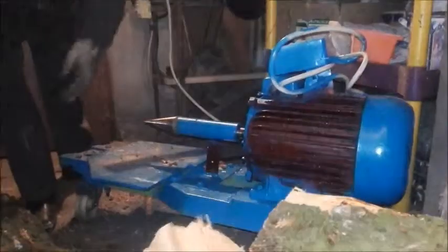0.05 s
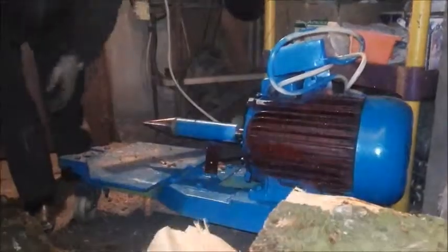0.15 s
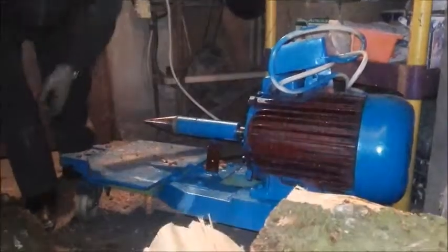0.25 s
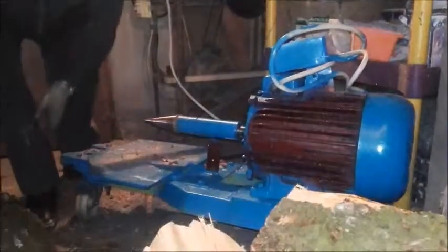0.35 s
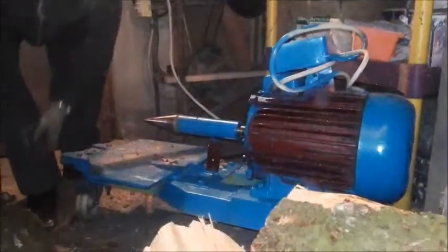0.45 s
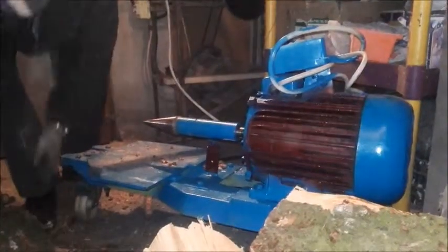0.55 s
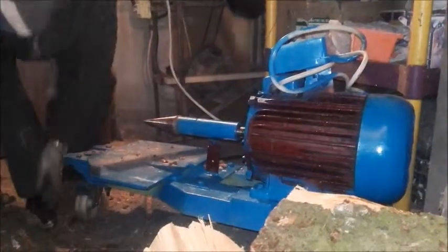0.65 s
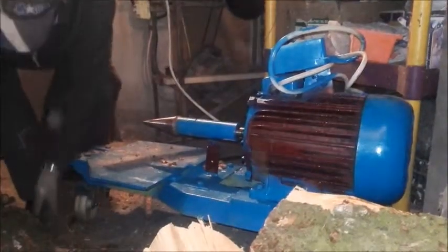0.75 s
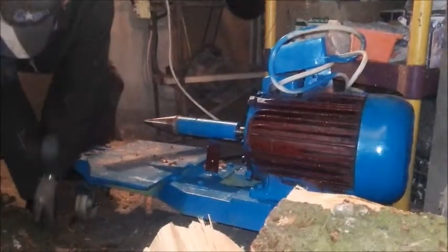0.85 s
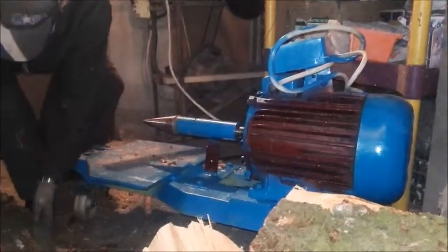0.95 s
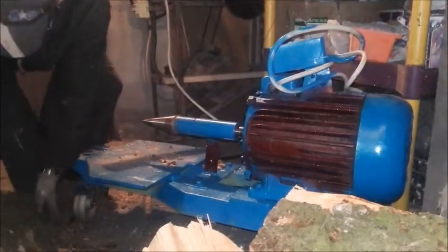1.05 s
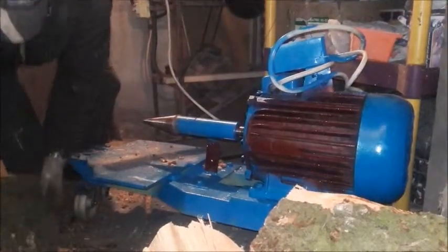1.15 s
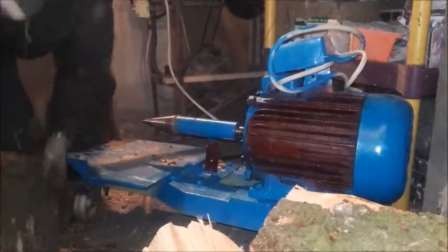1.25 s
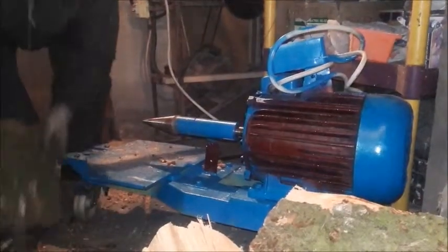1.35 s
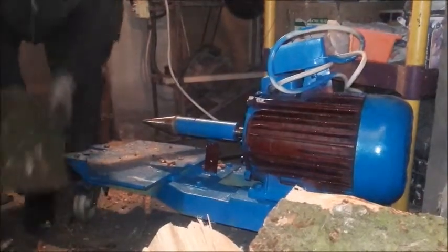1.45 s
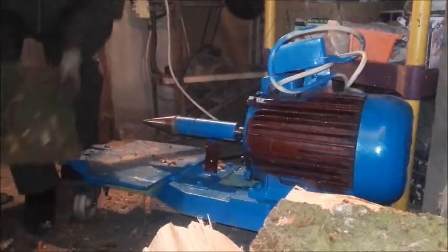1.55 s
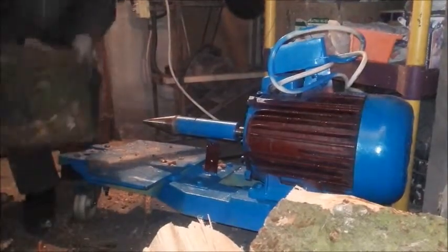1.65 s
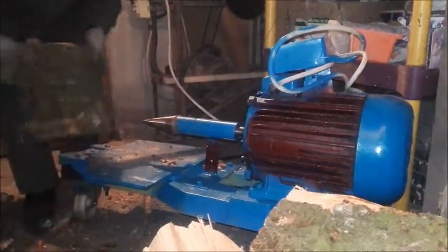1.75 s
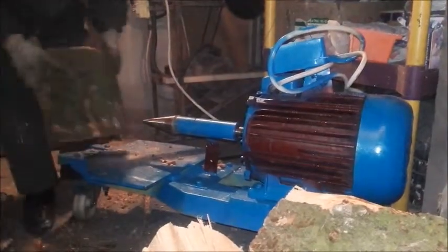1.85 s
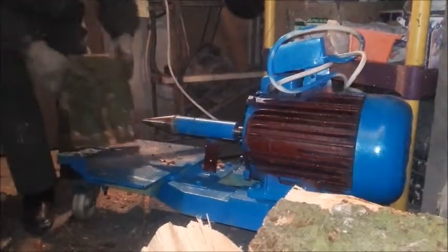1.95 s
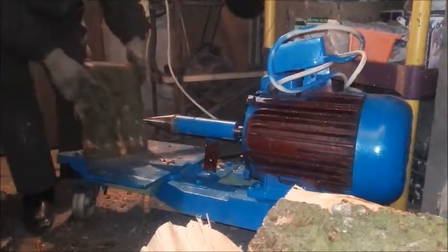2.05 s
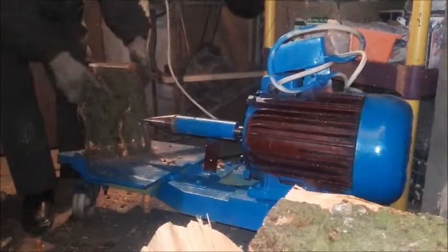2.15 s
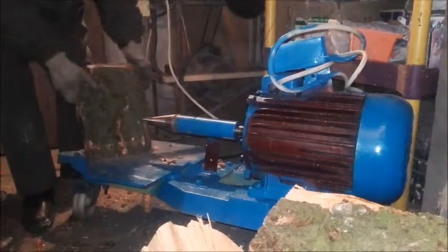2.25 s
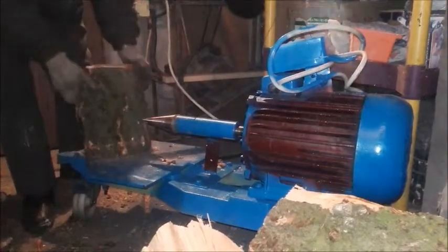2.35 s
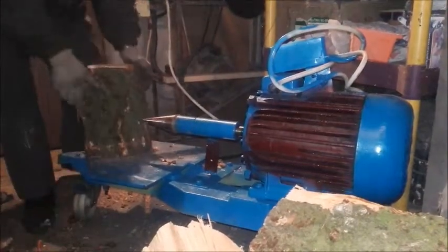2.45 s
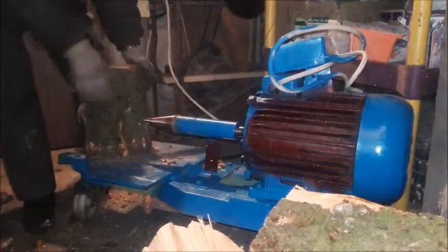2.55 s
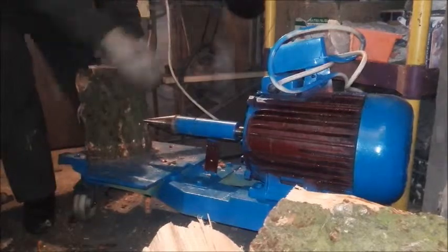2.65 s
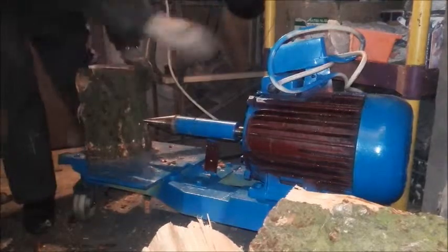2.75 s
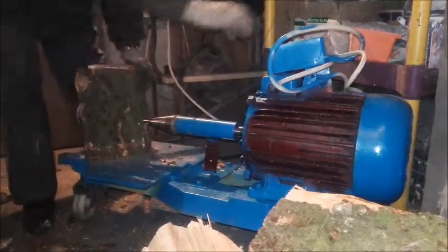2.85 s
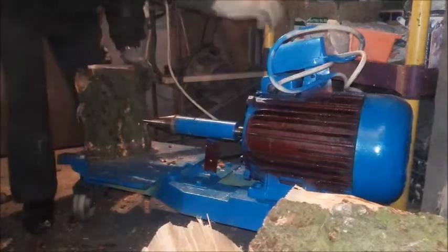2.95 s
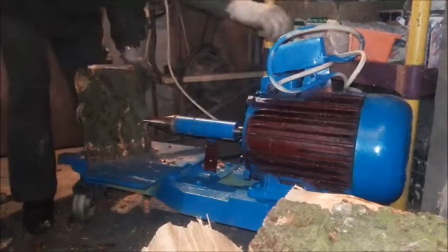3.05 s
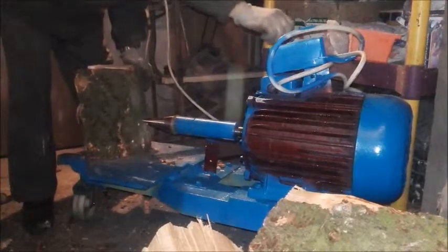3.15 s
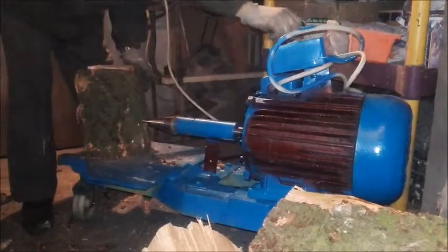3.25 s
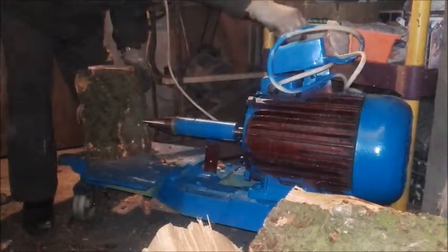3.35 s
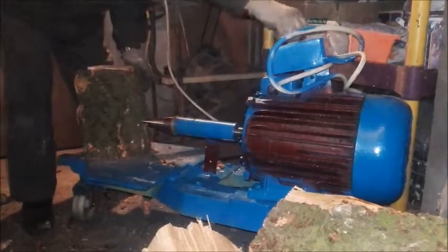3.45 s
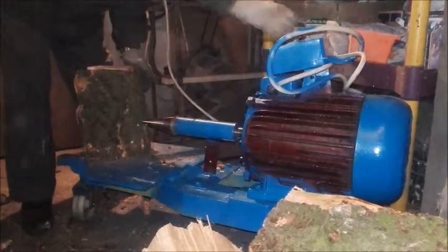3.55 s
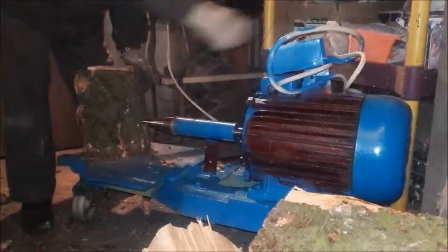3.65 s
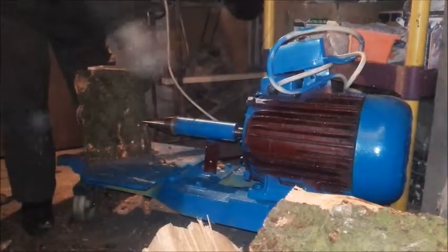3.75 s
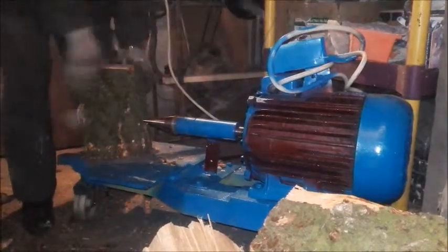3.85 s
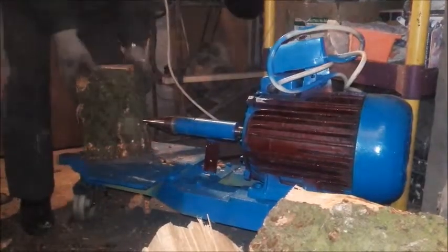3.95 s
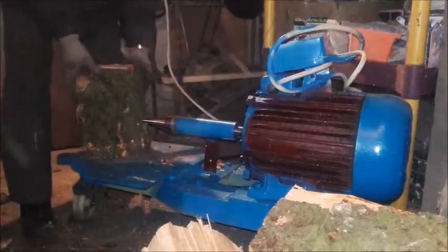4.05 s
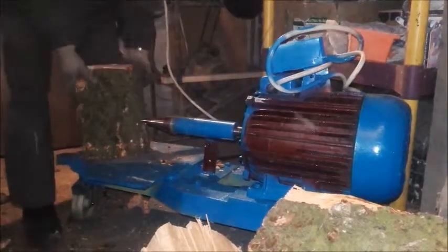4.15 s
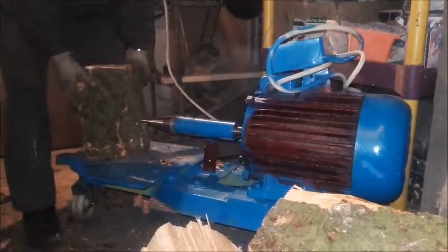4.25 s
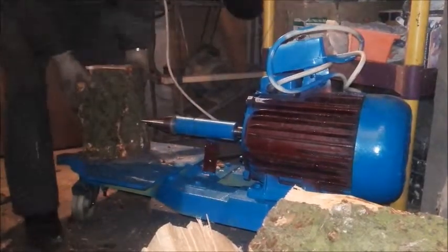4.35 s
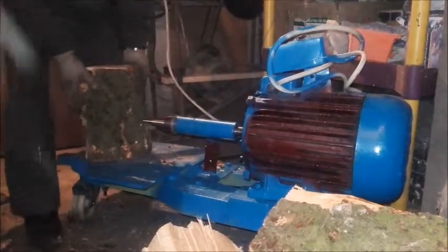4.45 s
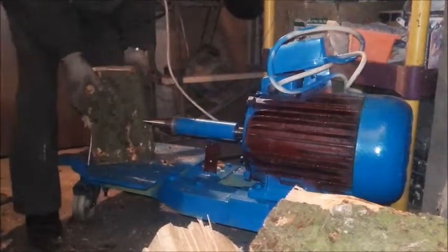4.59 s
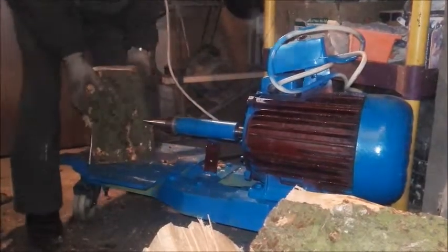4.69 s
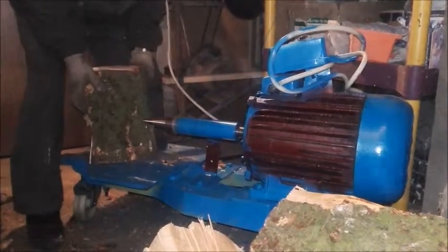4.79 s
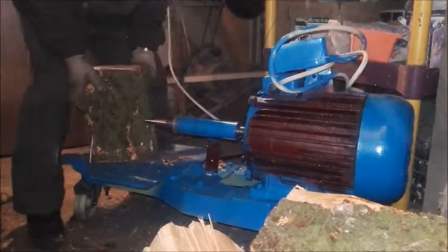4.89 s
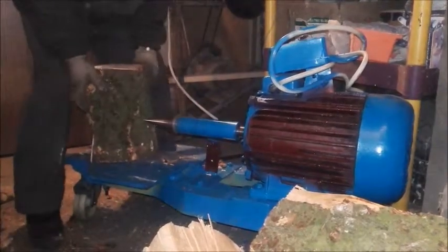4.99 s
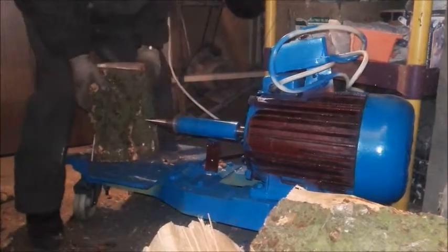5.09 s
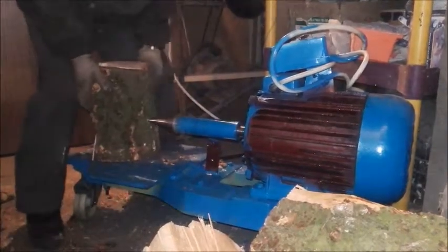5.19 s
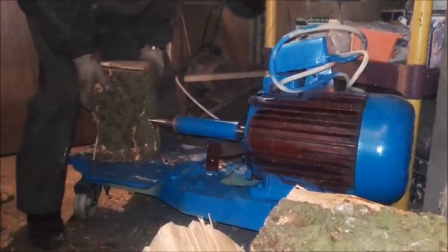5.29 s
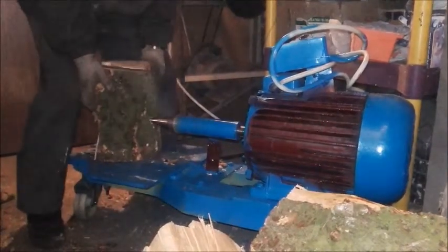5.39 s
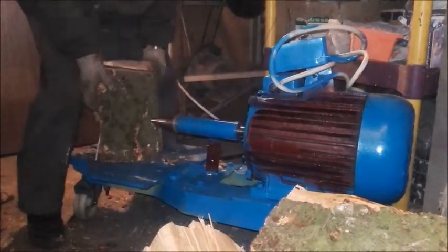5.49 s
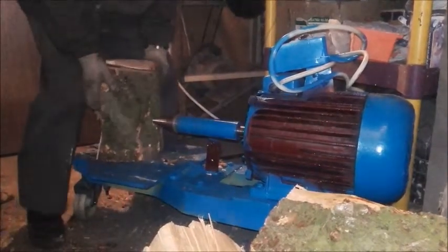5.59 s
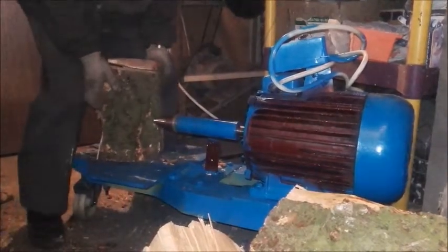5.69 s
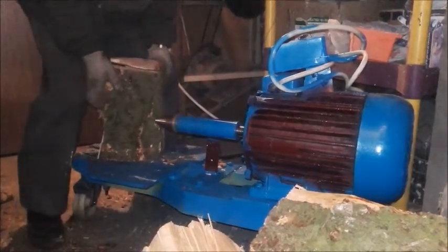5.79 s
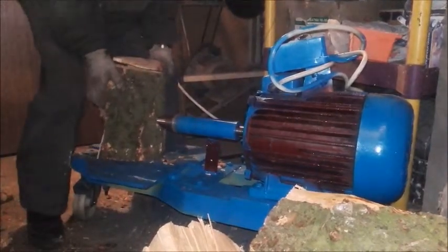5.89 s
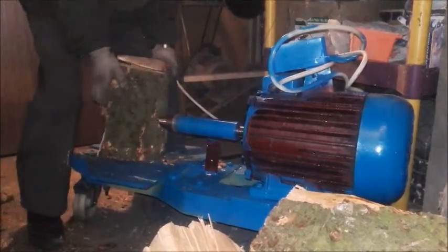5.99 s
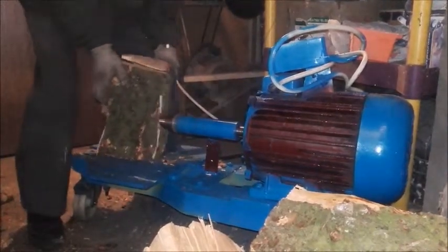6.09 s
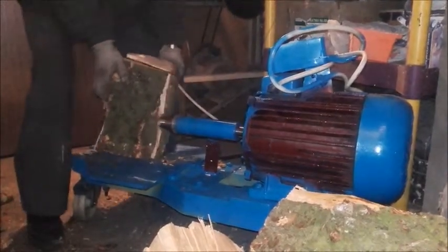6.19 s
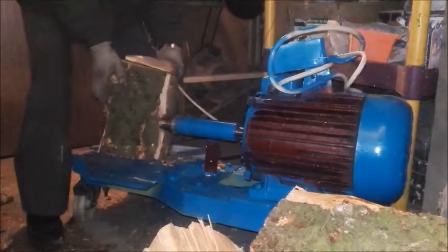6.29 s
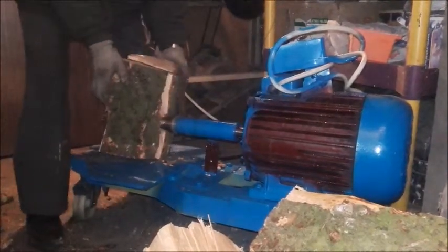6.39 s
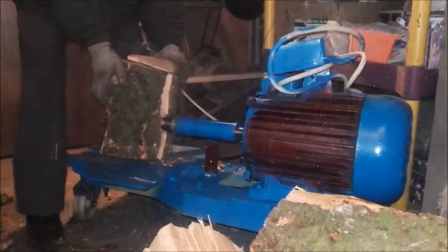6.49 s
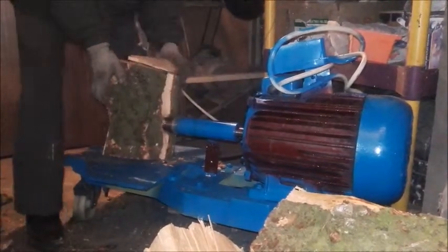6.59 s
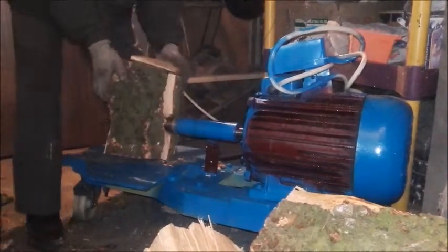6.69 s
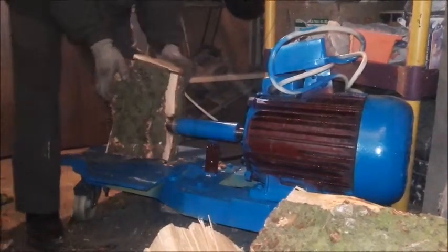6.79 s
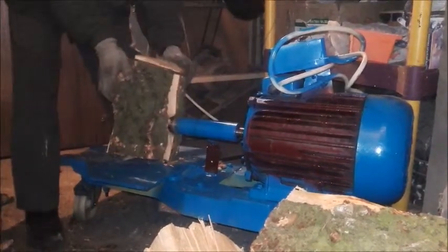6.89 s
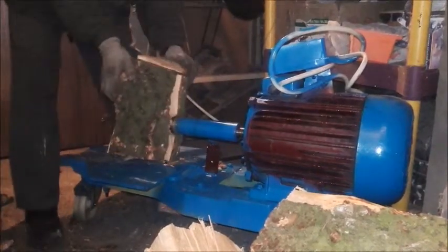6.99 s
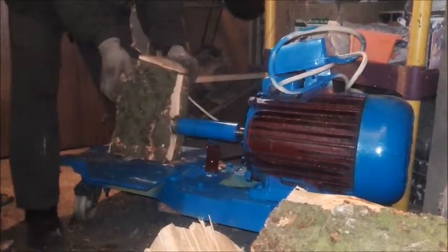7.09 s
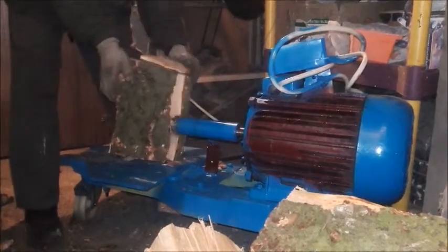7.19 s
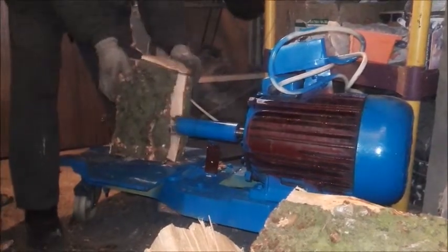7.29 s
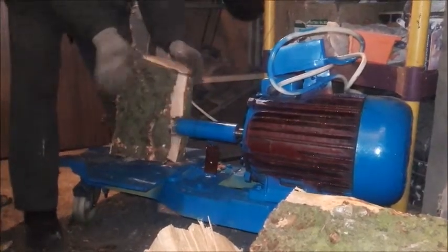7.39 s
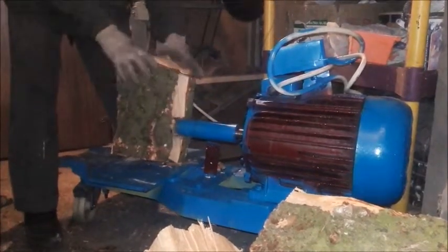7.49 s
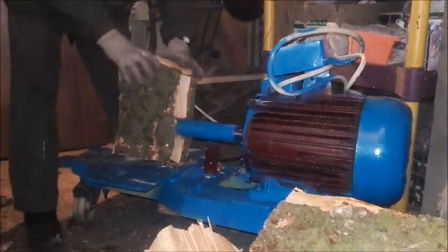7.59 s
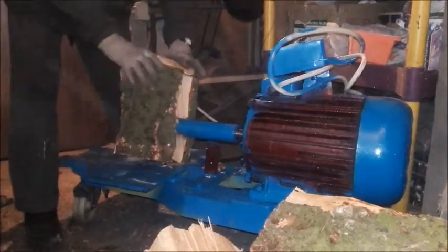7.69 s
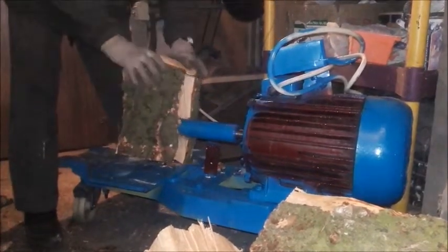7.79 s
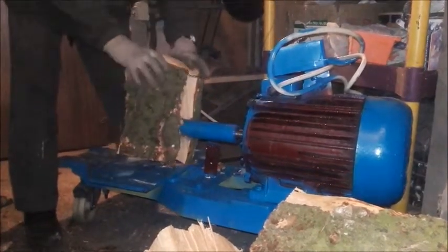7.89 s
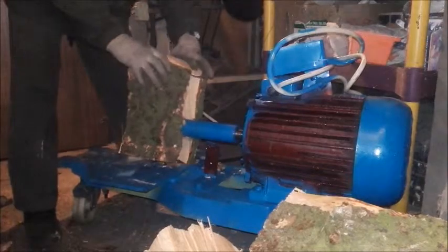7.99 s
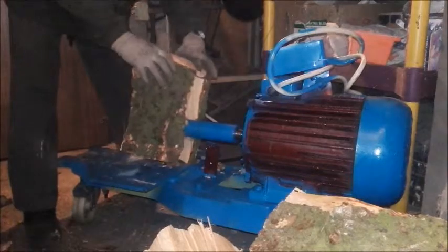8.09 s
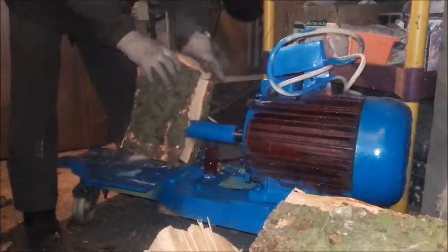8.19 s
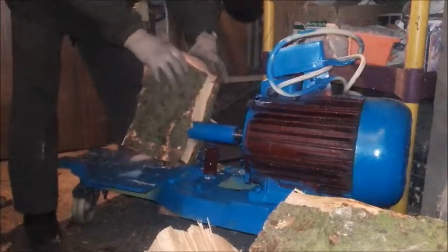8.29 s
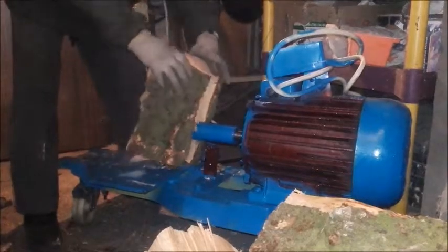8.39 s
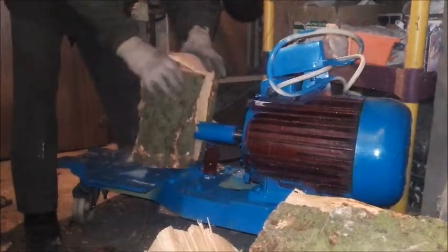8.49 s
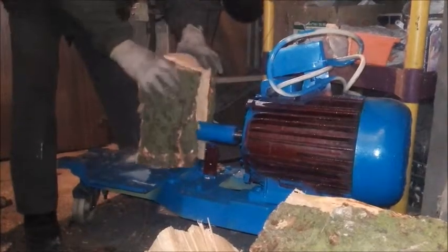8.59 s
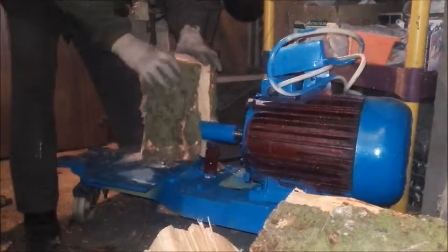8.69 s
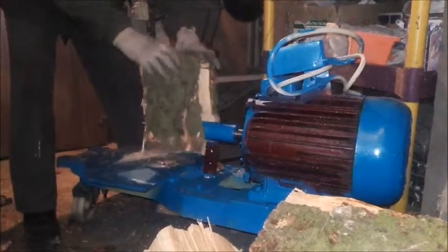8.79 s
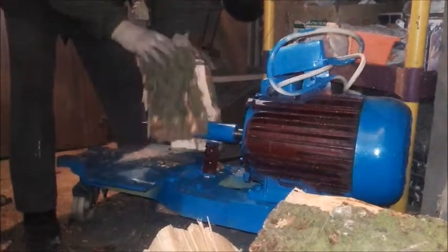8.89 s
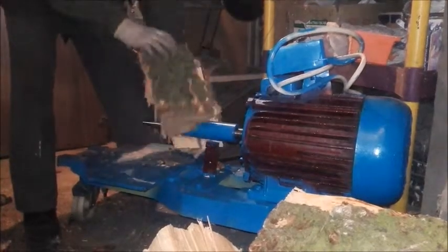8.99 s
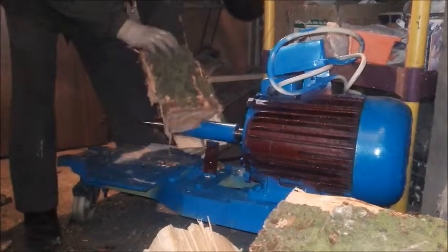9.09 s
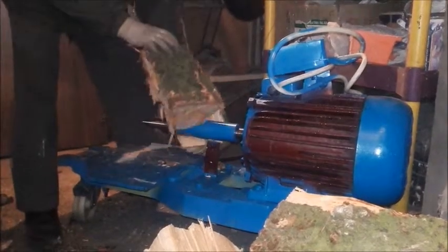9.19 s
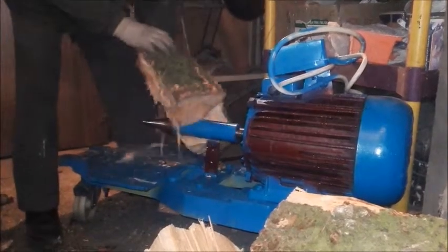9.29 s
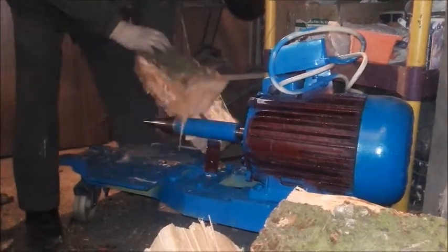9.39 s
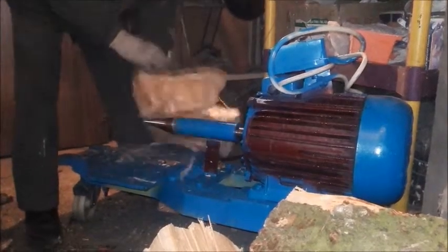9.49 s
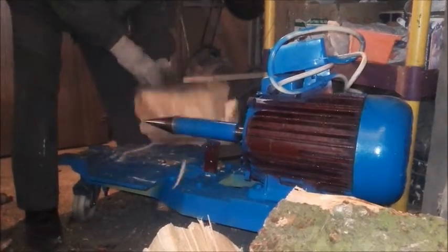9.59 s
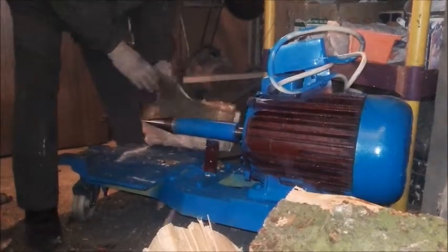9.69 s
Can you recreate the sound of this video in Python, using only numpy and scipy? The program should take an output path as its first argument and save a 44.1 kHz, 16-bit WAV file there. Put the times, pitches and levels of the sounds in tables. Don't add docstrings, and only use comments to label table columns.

```python
import sys
import numpy as np
from scipy import signal
from scipy.fft import rfft, irfft
from scipy.io import wavfile
from scipy.ndimage import uniform_filter1d

SR = 44100
rng = np.random.default_rng(int(sys.argv[2]) if len(sys.argv) > 2 else 0)


def inscribe(sig):
    pcm = np.round(np.clip(np.atleast_2d(sig).T, -1, 1) * 32767)
    wavfile.write(sys.argv[1], SR, pcm.astype(np.int16))


def invert_db(x):
    u = np.asarray(x, float) / 20
    return 10 ** u


N = 429534
t = np.arange(N) / SR

# [f/Hz, density/dB per Hz]
WOOD_SPECTRUM = [(59, -47), (100, -48), (176, -19), (374, -5), (451, -10), (621, -6), (736, 2), (1050, -4),
                 (1590, 0), (2600, 3), (4010, -15), (4900, -16.5), (6000, -31), (8000, -60), (19800, -120)]
# [f/Hz, density/dB per Hz]
SPLINTER_SPECTRUM = [(2000, -25), (3500, -5), (4800, 1), (5900, -5.5), (7200, -9), (8500, -1), (10600, 7),
                     (12700, 1), (15200, -4), (16300, -21)]
# [f/Hz, density/dB per Hz]
SHED_SPECTRUM = [(40, -18), (130, -15), (400, -11), (2100, -15.5), (2650, -12), (3900, -26), (8000, -30),
                 (14500, -24)]


def level(x, db):
    return x * invert_db(db) / np.sqrt(np.mean(x ** 2))


def curve(rows):
    s, *columns = np.transpose(rows)
    return [np.interp(t, s, c) for c in columns]


def swell(s, rise, hold, fall):
    return np.interp(t, np.cumsum([s, rise, hold, fall]), [0, 1, 1, 0])


def walk(rate_hz):
    step = 32
    k, count = int(SR / step / rate_hz), N // step + 2
    stairs = np.repeat(rng.standard_normal(count // k + 1), k)
    coarse = uniform_filter1d(uniform_filter1d(stairs, k), k)[:count]
    return np.interp(np.arange(N) / step, np.arange(count), level(coarse, 0))


def colour(x, spectrum):
    hz, db = np.transpose(spectrum)
    grid_hz = np.linspace(1, SR / 2, 2049)
    log_gain = np.interp(np.log(grid_hz), np.log(hz), db) * np.log(10) / 20
    cepstrum = irfft(log_gain)
    cepstrum[1:2048] *= 2
    cepstrum[2049:] = 0
    response = irfft(np.exp(rfft(cepstrum)))[:2048]
    return signal.fftconvolve(x, response / np.linalg.norm(response))[:len(x)]


def ring(x, hz, width_hz):
    return signal.lfilter(*signal.iirpeak(hz, hz / width_hz, SR), x)


def highpass(x, order, hz):
    return signal.sosfilt(signal.butter(order, hz, "high", fs=SR, output="sos"), x)


def burst(lasts_s, grain_db):
    age = np.arange(4096) / SR
    chance = rng.standard_normal(len(age)) * invert_db(grain_db * rng.standard_exponential(len(age)))
    return chance * np.exp(-age / np.clip(lasts_s, .0005, .03)) * (1 - np.exp(-age / 0.001))


def rattle(spectrum, t60_s):
    age = np.arange(int(.6 * SR)) / SR
    envelope = 1000 ** (-age / t60_s) * (1 - np.exp(-age / .0015))
    return level(colour(rng.standard_normal(len(age)), spectrum) * envelope, 0)


def strike(body, contact_s):
    age = np.arange(int(.6 * SR)) / SR
    modes = np.zeros(len(age))
    scatter = rng.standard_normal((len(body), 2))
    for (hz, db, t60_s), (a, b) in zip(body, scatter):
        tone = np.sin(2 * np.pi * hz * (1 + 0.0042 * b) * age)
        modes += invert_db(db + 1.5 * a) * tone * 1000 ** (-age / t60_s)
    return signal.fftconvolve(modes, burst(contact_s, 1.5))[:len(age)]


def add(track, s, x, db):
    i = int(s * SR)
    track[i:i + len(x)] += (x * invert_db(db) / np.abs(x).max())[:N - i]


def motor():
    # [t/s, load 0-1]
    screw_load = [(3.6, 0.05), (4.8, .12), (4.95, .55), (5.7, 0.55), (6.4, 0.7), (6.9, 0.9), (7.15, 0.3),
                  (7.95, 0.8), (8.74, 0.85), (8.78, .35), (8.9, .6), (9.74, 0.4)]
    # [f/Hz, level/dB, change/dB once the cone is buried]
    mesh_lines = [(123.8, -57, 0), (247.6, -46, 1), (371.4, -52, -2), (409, -54, 7), (498, -47, 1),
                  (560, -52, 9), (575, -48, -4), (786, -56, 11), (796.7, -47, -8), (899.0, -39, -7.5),
                  (925.9, -41.5, -10), (1028, -45, -7), (1055, -56, 11), (1257, -49, 0), (1308, -49, -4),
                  (1362, -48, 7), (1416, -51, -2), (1464, -47, 5), (1609, -44, 0), (1634, -38, 1),
                  (1658, -38, -3), (1684, -45, 0), (1717, -45, -3), (1766, -43, 2), (1938, -51, -3),
                  (2070, -45.5, -1), (2177, -39.5, 0), (2589, -50, -4), (2713, -56, 10), (2918, -49, -2),
                  (3031, -52, -3), (3219, -52, 1)]
    # [f/Hz, level/dB]
    whine_lines = [(4436, -77), (4813, -80), (7101, -83), (9098, -85), (9798, -71), (10874, -80),
                   (11795, -87), (12597, -80)]
    # [f/Hz, width/Hz, level/dB]
    frame_rings = [(237, 10, -26), (532, 17, -1), (830, 52, -10), (1350, 26, -18), (1630, 50, 4.5),
                   (2158, 13, 24), (2570, 73, -31), (2930, 34, -37)]
    # [f/Hz, density/dB per Hz]
    roar_spectrum = [(24, -83), (40, -32), (166, -17.5), (237, -6.5), (306, -8), (400, -9), (492, -9),
                     (688, -6), (1040, -1.5), (1520, -12), (1640, -2), (1890, -8.5), (2120, -7.5),
                     (3150, -7.5), (4500, -42), (5850, -86), (9900, -120)]
    # [f/Hz, density/dB per Hz]
    fan_spectrum = [(2060, -51), (3500, -17), (3920, -11.5), (4570, -6), (5600, -37), (8050, -30),
                    (10100, -14.5), (10300, -16), (15100, -24), (16000, -25)]
    # [t/s, level/dB, swell/s, fade/s]
    boom_jolts = [(3.46, -39, 0.04, 0.1), (6.05, -30, 0.019, 0.15), (7.01, -32, 0.07, 0.082),
                  (8.99, -31, 0.054, 0.1), (9.05, -27, 0.1, .07), (9.65, -28, 0.033, .08),
                  (9.71, -28.5, .03, .1)]
    shaft_hz, switch_s, inrush_rise_s, log_pressed_s = 24.76, 3.416, 0.056, 4.67
    waver_db, pressed_db, running_db = 1.9, 7, -27
    boom_loose_db, boom_damped_db = -34.5, -40.5

    load = curve(screw_load)[0]
    stall_db = -9 * swell(5.74, 0.22, .02, 0.11)
    buried = swell(6.2, .3, N, N)
    low_whine_db = 2.5 - 8 * load + stall_db
    high_whine_db = -3 + 9 * load + stall_db
    loose_db = pressed_db * (swell(log_pressed_s, .4, N, N) - 1)

    def load_db(hz):
        gain_db = low_whine_db * (1600 < hz < 1800) + high_whine_db * (2000 < hz < 2250)
        return gain_db + loose_db * (780 < hz < 1040)

    drift_s = np.cumsum(1 + 0.0004028 * walk(1.53)) / SR
    tones = np.zeros(N)
    for hz, db, change_db in mesh_lines + [(*line, 0) for line in whine_lines]:
        gain = invert_db(db + load_db(hz) + change_db * buried + waver_db * walk(6.6))
        turns = hz * drift_s + 0.11 * (1 + hz / 9000) * walk(12) + rng.random()
        tones += gain * np.sin(2 * np.pi * turns)

    roar = level(colour(rng.standard_normal(N), roar_spectrum), -1.24)
    spin_up = swell(switch_s, 0.37, N, N)
    bass = signal.sosfiltfilt(signal.butter(2, 200, fs=SR, output="sos"), roar)
    roar = roar - (1 - spin_up) * bass
    roar *= 1 + 0.075 * np.sin(4 * np.pi * shaft_hz * drift_s)
    fan = level(colour(rng.standard_normal(N), fan_spectrum), -30.5) * invert_db(0.43 * walk(6.8))

    shake = rng.standard_normal(N)
    frame = np.zeros(N)
    for hz, width_hz, db in frame_rings:
        frame += invert_db(db + load_db(hz)) * level(ring(shake, hz, width_hz), 0) * np.sqrt(width_hz)
    throb = 1 + 0.36 * np.sin(2 * np.pi * shaft_hz * drift_s)
    frame = throb * level(frame, -15.0)

    surge = invert_db(9.5 * swell(switch_s, inrush_rise_s, 0.022, 0.17))
    duck = invert_db(-6.5 * swell(5.95, 0.49, 1.26, 0.85))
    sound = invert_db(running_db) * ((roar + frame) * surge + invert_db(30.0) * tones + fan)

    boom = level(ring(ring(shake, 490, 55) + ring(shake, 566, 37), 550, 230), 0)
    damped = swell(log_pressed_s, 0.16, N, N)
    drone = invert_db(boom_loose_db + (boom_damped_db - boom_loose_db) * damped)
    jolts = np.zeros(N)
    for s, db, rise_s, fall_s in boom_jolts:
        jolts += invert_db(db) * swell(s - rise_s, rise_s, 0.023, fall_s) ** 3
    switched_on = swell(switch_s, inrush_rise_s, N, N) ** 1.45
    return (duck * (sound + drone * boom) + jolts * boom) * switched_on


def cracks():
    # [t/s, peak/dB, ring f/Hz, tearing/s]
    tumble = [(0.0135, -21, 2030, 0.0096), (0.022, -12.5, 2820, 0.0079), (0.031, -16, 1900, 0.0073),
              (0.043, -9.5, 2400, 0.0066), (0.050, -15.5, 2500, 0.0054), (0.056, -14, 2310, 0.0073),
              (0.066, -17, 1900, 0.0076), (0.079, -13, 1220, 0.01), (0.081, -15, 2900, .004),
              (0.11, -38, 1202, 0.0072), (0.188, -26, 2600, 0.005), (0.202, -29, 2720, 0.0088),
              (0.214, -32, 1500, .003), (0.221, -18.5, 1500, 0.0033), (0.227, -26.5, 1690, 0.01),
              (0.26, -38, 2530, 0.013), (0.298, -34, 830, 0.0067), (0.722, -41, 2750, 0.013),
              (1.211, -47, 1650, .03), (1.24, -49, 1650, .03)]
    # [t/s, peak/dB, ring f/Hz, tearing/s]
    big_splits = [(5.996, -6.5, 1700, 0.0068), (6.022, -2.5, 2250, 0.007), (6.027, -3, 2620, 0.012),
                  (6.034, -4, 1890, 0.0072), (6.042, -2.5, 2570, 0.0074), (6.048, -2.5, 970, 0.0074),
                  (6.055, -1.5, 1140, 0.0081), (6.07, -8, 2440, 0.0066), (6.081, -4, 2540, 0.0033),
                  (6.088, -8, 1780, 0.0095), (6.122, -4, 2480, 0.0031), (6.127, -17, 915, 0.0046),
                  (6.149, -6.5, 2400, 0.0071), (6.177, -10, 2460, 0.0051), (6.18, -6.5, 880, 0.007),
                  (6.187, -2, 2300, 0.0023), (6.192, -13, 2520, 0.0026), (6.202, -6, 2480, 0.0024),
                  (6.209, 0, 2480, 0.0072), (6.218, -9.5, 2690, 0.01), (6.226, -6, 850, 0.015),
                  (6.248, -10, 2470, 0.012), (6.281, -12.5, 820, 0.024), (6.288, -5, 1800, 0.0059),
                  (6.299, -14, 1900, 0.0064), (6.338, -13.5, 2780, 0.0051), (6.999, -1, 3060, 0.0085),
                  (7.004, -3.5, 2400, 0.0047), (7.011, -9.5, 2470, 0.021), (7.022, -2, 1770, 0.0057),
                  (7.04, -12.5, 1130, 0.015)]
    # [t/s, peak/dB, ring f/Hz, tearing/s]
    small_cracks = [(6.460, -11.5, 2560, 0.0058), (6.467, -17, 1750, 0.0069), (6.5028, -20.5, 2610, 0.033),
                    (6.9661, -20, 2570, 0.033), (7.1034, -14.5, 2480, 0.0025), (7.55, -24, 2240, 0.0033),
                    (7.574, -15, 2770, 0.0026), (7.585, -22, 1800, 0.0028), (7.637, -21, 2800, 0.0056),
                    (7.348, -17, 2530, 0.0052), (7.6787, -12, 2640, 0.0026), (7.71, -15.5, 2570, 0.013),
                    (7.7602, -20, 2840, 0.01), (7.8431, -5.5, 1740, 0.0034), (7.847, -9.5, 2490, 0.0088),
                    (7.87, -14, 2720, 0.0051), (7.918, -11.5, 2920, 0.0059), (7.933, -13, 2630, 0.0031),
                    (7.9755, -10, 2460, 0.0047), (7.986, -17, 2530, 0.0075), (8.008, -23, 2550, .006),
                    (8.31, -19, 2700, 0.02), (8.7522, -12.5, 2580, 0.0083), (8.7884, -13.5, 2720, 0.015),
                    (8.82, -32, 2770, 0.013), (9.0026, -12.5, 1690, 0.0099), (9.3148, -14.5, 2350, 0.0074),
                    (9.421, -18, 2800, 0.031), (9.501, -16, 2550, .01), (9.6302, -9, 1780, 0.032),
                    (9.6578, -13.5, 2760, 0.013), (9.69, -17, 1100, 0.029), (9.7194, -20, 1570, 0.011)]
    splinters_db, body_db, first_fibre_db = -21, -1.5, -2
    snap_s, clean_break_s = 0.044, .004

    out = np.zeros(N)
    snap = colour(1. * (np.arange(512) == 8), WOOD_SPECTRUM)
    # events, ring/dB, ring Q
    for events, ring_db, sharp in ((tumble + big_splits, 1, 5), (small_cracks, 4.5, 7)):
        for s, db, hz, lasts_s in events:
            rush = burst(lasts_s, 2.2)
            add(out, s, colour(rush, SPLINTER_SPECTRUM), db + splinters_db)
            rush[8:19] += snap_s / lasts_s * np.hanning(11) / 3
            body = level(colour(rush, WOOD_SPECTRUM), 0)
            body += level(ring(ring(rush, hz, hz / sharp), hz, hz / 2), ring_db)
            add(out, s, body, db + body_db)
            fibre = (snap + 2 * ring(snap, hz, hz / 2)) * rng.choice([-1, 1])
            clean_db = 20 * np.log10(min(1, clean_break_s / lasts_s))
            add(out, s, fibre, db + first_fibre_db + clean_db)
    return out


def fibres():
    # [t/s, peak/dB]
    bark_chips = [(0.0215, -15.5), (0.046, -16), (0.0782, -41), (0.1176, -50), (0.1725, -50), (0.188, -38),
                  (0.2004, -30), (0.261, -40.5)]
    # [t/s, peak/dB]
    bite_snaps = [(4.255, -39), (4.67, -38), (5.3682, -34), (5.4784, -31.5), (5.5473, -33), (5.5842, -33),
                  (5.6321, -31), (5.6625, -27), (5.6755, -25), (5.7104, -25), (5.7688, -28), (5.82, -26),
                  (5.8335, -25), (5.8845, -35)]
    # [t/s, peak/dB]
    ticks = [(5.8844, -28), (5.9193, -24), (5.9582, -24), (5.9792, -24), (5.995, -12), (6.021, -12),
             (6.0989, -26), (6.1493, -28), (6.1762, -26), (6.2086, -14), (6.2823, -18), (6.4603, -14.5),
             (6.5045, -23), (6.9649, -37.5), (6.9819, -20), (7.0012, -10), (7.1026, -25), (7.146, -24),
             (7.636, -23), (7.6773, -19), (7.7675, -21), (7.844, -12), (7.8898, -21), (7.918, -14.5),
             (7.9777, -12.5), (8.7506, -20), (8.7843, -23), (9.005, -15), (9.311, -16), (9.6299, -22),
             (6.6628, -32), (6.8902, -31), (7.2459, -35), (7.703, -21), (8.083, -21.5), (9.0444, -24),
                  (9.1441, -28), (9.4694, -28), (9.6694, -35), (9.7213, -43.5)]
    # [t/s, level/dB]
    tearing = [(5.2, -70), (5.6, -70), (6.0, -48), (6.2, -38), (6.32, -54), (6.75, -60.5), (7.1, -54.5),
               (7.5, -51.5), (7.85, -47), (8.05, -53.5), (8.3, -47.5), (8.6, -49.5), (8.8, -46.5),
               (8.9, -46), (9.05, -47.5), (9.25, -48), (9.5, -47), (9.74, -51.5)]
    creak_hz, creak_width_hz = 2750, 600

    out = np.zeros(N)
    for s, db in bark_chips + bite_snaps + ticks:
        add(out, s, colour(burst(0.0015, 1.4), SPLINTER_SPECTRUM), db - 10)
        add(out, s, colour(burst(0.016, 0.59), SPLINTER_SPECTRUM), db - 12)

    sizes_db = 2.7 * np.minimum(rng.standard_exponential(N), 6) + 2.2 * walk(40)
    grains = rng.standard_normal(N) * invert_db(sizes_db)
    spray = level(colour(np.roll(grains, 90), SPLINTER_SPECTRUM), 0)
    gives_way = 1 + 0.3 * swell(6.01, 0.017, 0.26, .08)
    body = level(colour(grains, WOOD_SPECTRUM), 15.5) * gives_way
    creak = ring(ring(grains, creak_hz, creak_width_hz), creak_hz, 2 * creak_width_hz)
    creak = level(creak, 8) * swell(7.4, 0.74, N, N)
    strain = invert_db(curve(tearing)[0]) * (t >= tearing[0][0])
    return out + (spray + body + creak) * strain


def table():
    # [f/Hz, level/dB, t60/s]
    table_modes = [(248, -22, 0.56), (345, -13, 0.45), (415, -12, 0.3), (484, -10, 0.42), (560, -1, 0.2),
                   (624, -7, 0.3), (824, -4, 0.22), (931, -12, 0.26), (1335, -16, 0.28), (1642, -16, 0.18),
                   (2288, -17, 0.19), (2600, -25, 0.55), (3100, -27, 0.15), (4156, -42, 0.2),
                   (5265, -38, 0.13)]
    # [t/s, peak/dB, rattle t60/s, ring/dB]
    blows = [
        (2.246, -3.5, 0.31, -3.5),
        (2.301, -21, 0.14, -5),
        (9.636, -12.5, 0.23, -15),
    ]
    # [f/Hz, density/dB per Hz]
    knock_spectrum = [(35, -68.5), (60, -67), (170, -45.5), (240, -9), (308, -11), (417, 4), (515, -8),
                      (566, 3.5), (749, -6.5), (822, -1), (1510, -13), (1660, -4), (1910, -16),
                      (2770, -14.5), (3150, -23), (3500, -33.5), (4300, -36.5), (6000, -52), (16000, -75.5)]
    # [t/s, peak/dB, t60/s]
    scuffs = [(0.1, -24.5, 0.51), (0.155, -31, 0.21), (0.294, -31.5, 0.049), (1.183, -49.5, 0.1),
              (1.216, -45, 0.3), (1.247, -52.5, 0.11), (1.279, -49, 0.058), (2.201, -50, 0.5),
              (2.421, -47, 1), (2.862, -47.5, 0.21), (3.334, -54, 0.098)]
    # [f/Hz, density/dB per Hz]
    ground_spectrum = [(29, -46), (50, 1.5), (260, 0.5), (507, -9), (615, -7), (765, -7.5), (927, -10.5),
                       (1330, -7.5), (2060, -17), (2620, -6), (5150, -38), (10600, -39), (16000, -37)]
    # [f/Hz, level/dB, t60/s]
    housing_modes = [(484, 6, 0.2), (549, 0, 0.16), (624, 1, 0.16), (678, -1, 0.25), (1020, -10, 0.12)]
    # [t/s, peak/dB]
    rotor_jolts = [(3.424, -33), (3.436, -25), (3.445, -9), (3.466, -9), (3.495, -13), (3.52, -15),
                   (3.545, -21)]

    out = np.zeros(N)
    for s, db, t60_s, ring_db in blows:
        add(out, s, rattle(knock_spectrum, t60_s) + level(strike(table_modes, 0.045), ring_db), db)
        add(out, s, rattle(SPLINTER_SPECTRUM, 0.61), db - 43)
    for s, db, t60_s in scuffs:
        add(out, s, rattle(ground_spectrum, t60_s), db)
    for s, db in rotor_jolts:
        add(out, s, ring(ring(strike(housing_modes, 0.004), 580, 260), 560, 320), db)
    return out


def boards():
    # [t/s, peak/dB, f/Hz, t60/s]
    thumps = [(0.005, -39, 125, 0.49), (0.2, -49, 133, 0.28), (0.297, -42, 160, 0.046),
              (1.222, -50, 297, 0.2), (1.275, -52, 318, 0.1), (2.28, -50, 111, .4)]
    out = np.zeros(N)
    for s, db, hz, t60_s in thumps:
        add(out, s, ring(ring(rattle(SHED_SPECTRUM, t60_s), hz, hz / 4), hz, hz / 2), db)
    return out


def echo(hits):
    t60_s, wet_db = .33, -10
    age = t[:SR // 2]
    tail = rng.standard_normal(len(age)) * 1000 ** (-age / t60_s) * (age > .004)
    return invert_db(wet_db) * signal.fftconvolve(hits, tail / np.linalg.norm(tail))[:N]


def shed_floor():
    air = level(colour(rng.standard_normal(N), SHED_SPECTRUM) * invert_db(0.5 * walk(6.9)), -66)
    return air + level(ring(rng.standard_normal(N), 402, 25), -79)


def scene():
    hits = table() + cracks() + fibres()
    heard = highpass(hits + echo(hits), 4, 190)
    steady = highpass(motor() + boards(), 2, 90)
    return (heard + steady + shed_floor())[None]


def roll_off(x):
    return signal.sosfilt(signal.butter(12, 16480, fs=SR, output="sos"), x)


def record(dry):
    ceiling, offset, top_hz = .93, -0.0005, 15740
    rounded = dry / (1 + (dry / ceiling) ** 6) ** (1 / 6)
    rounded = highpass(rounded, 2, 60) + offset
    mix = signal.sosfilt(signal.ellip(14, .3, 60, top_hz, fs=SR, output="sos"), rounded)
    return roll_off(mix)


dry = scene()
out = record(dry)
inscribe(out)
```